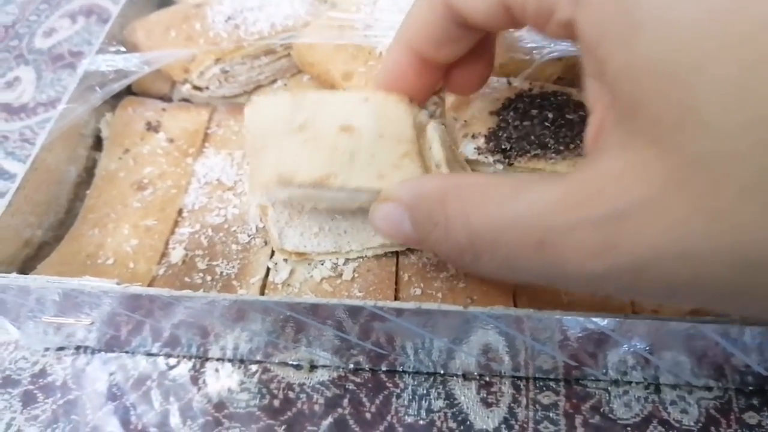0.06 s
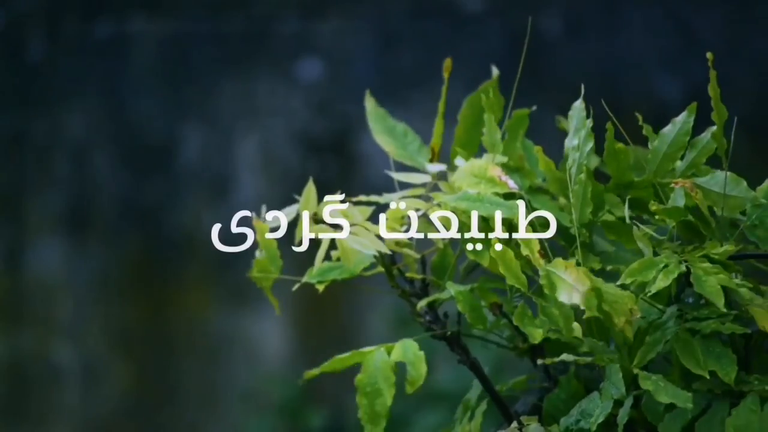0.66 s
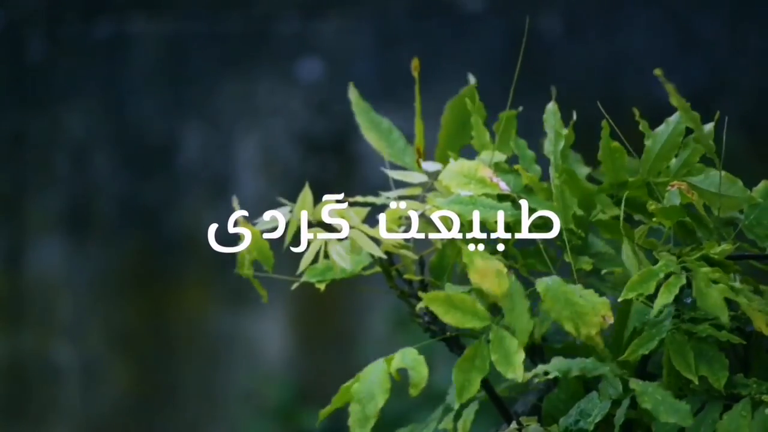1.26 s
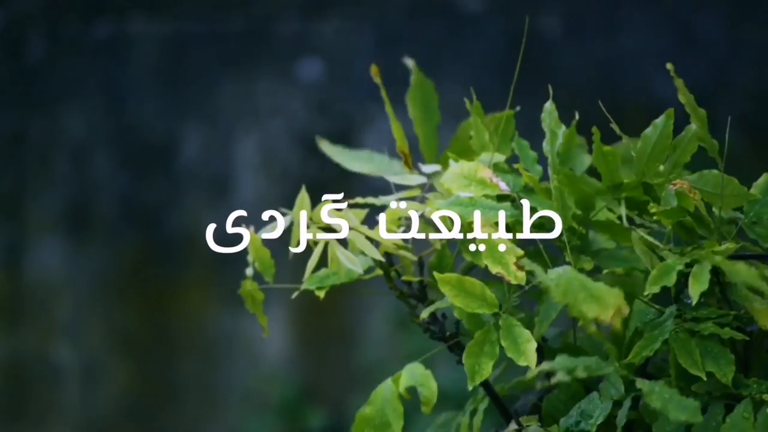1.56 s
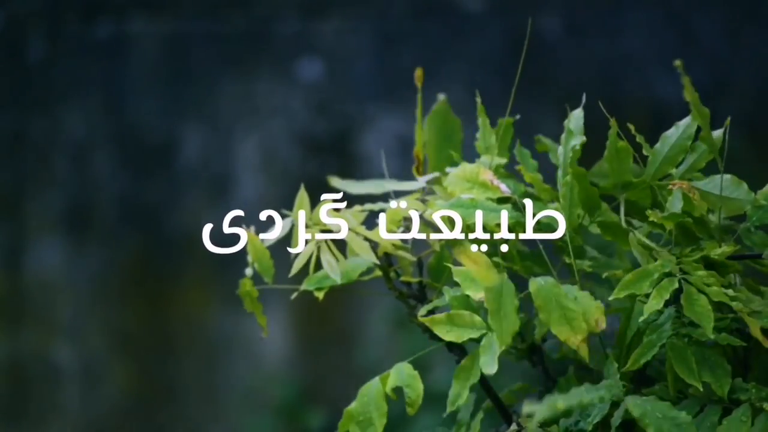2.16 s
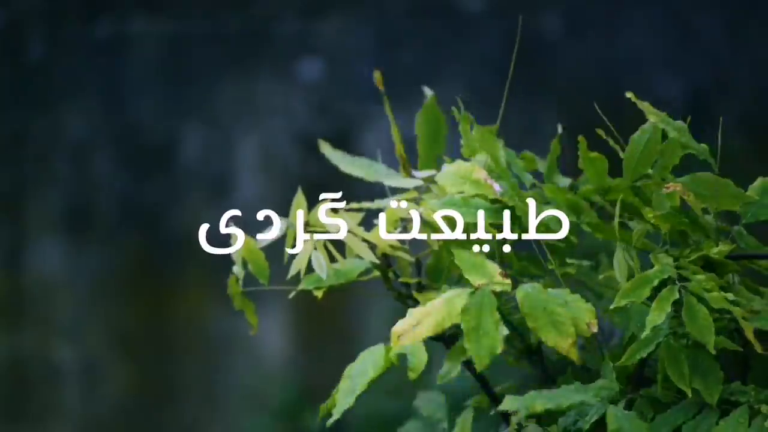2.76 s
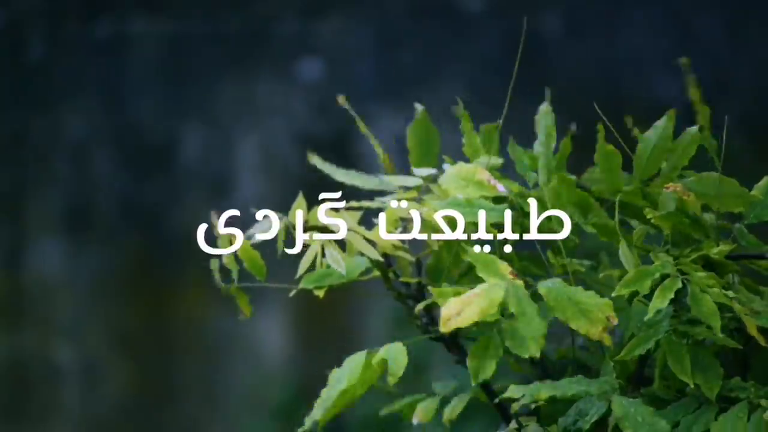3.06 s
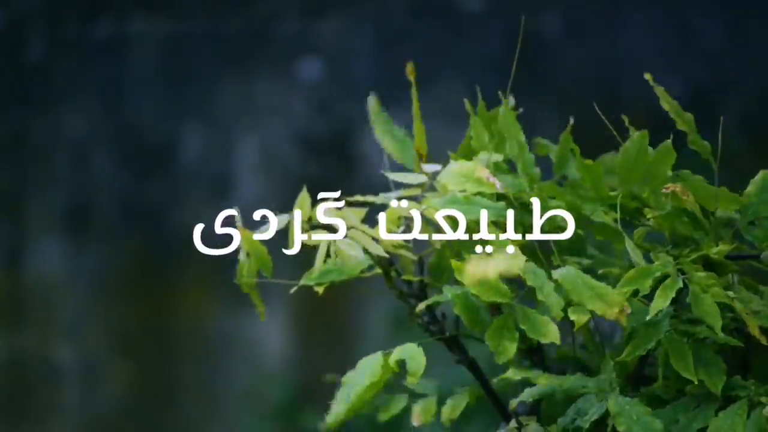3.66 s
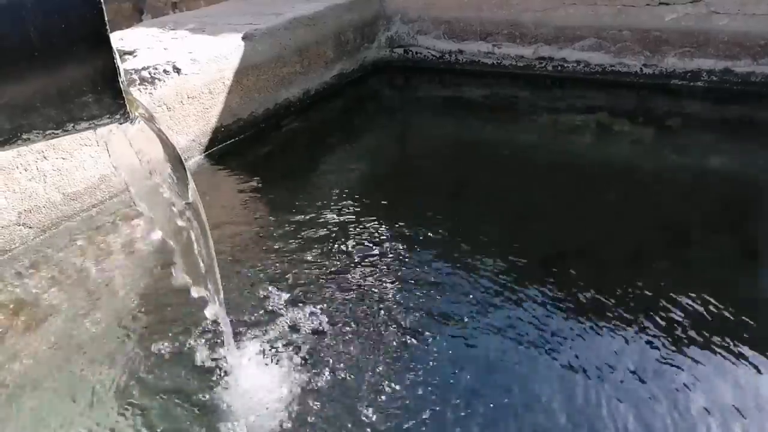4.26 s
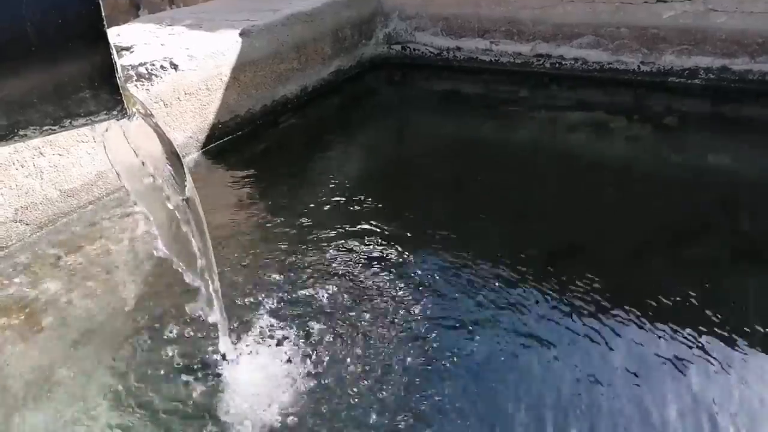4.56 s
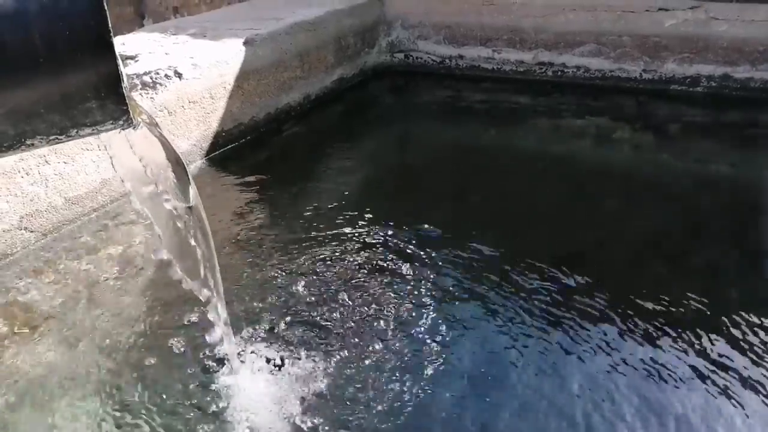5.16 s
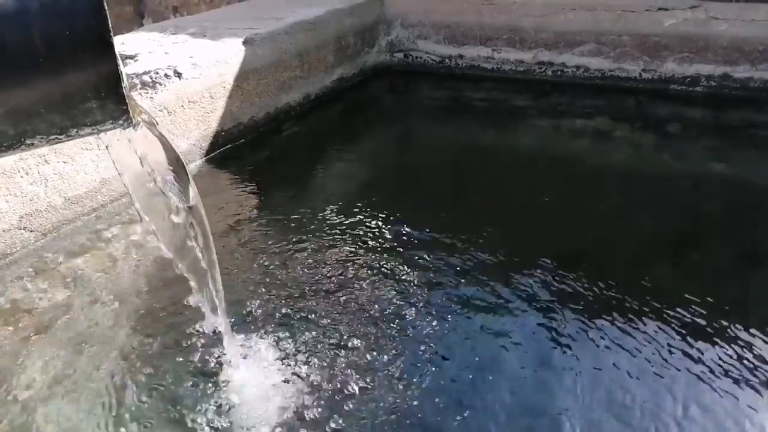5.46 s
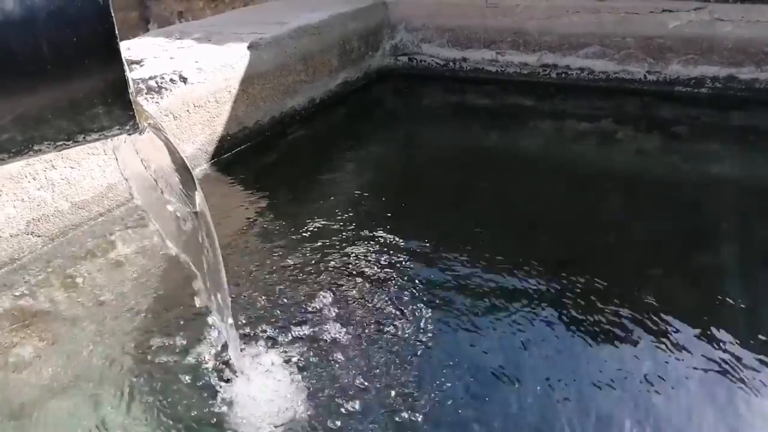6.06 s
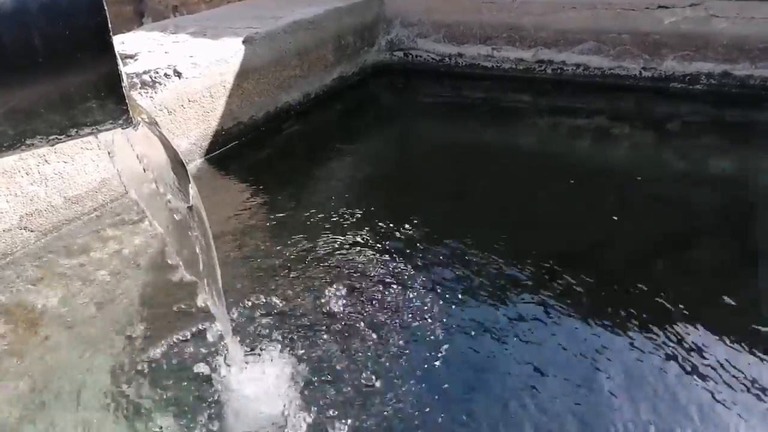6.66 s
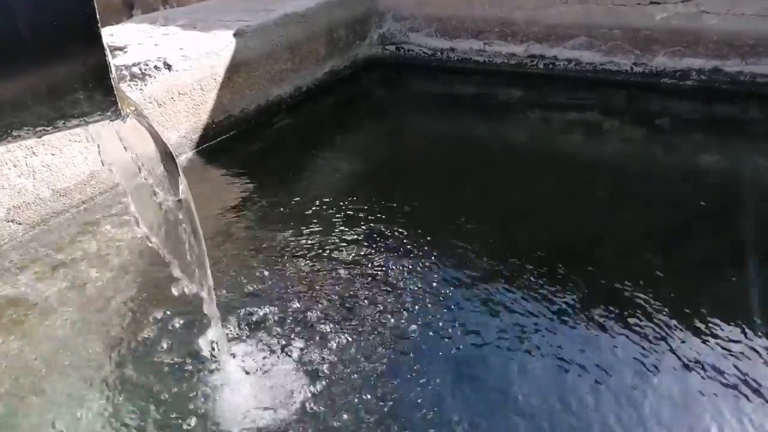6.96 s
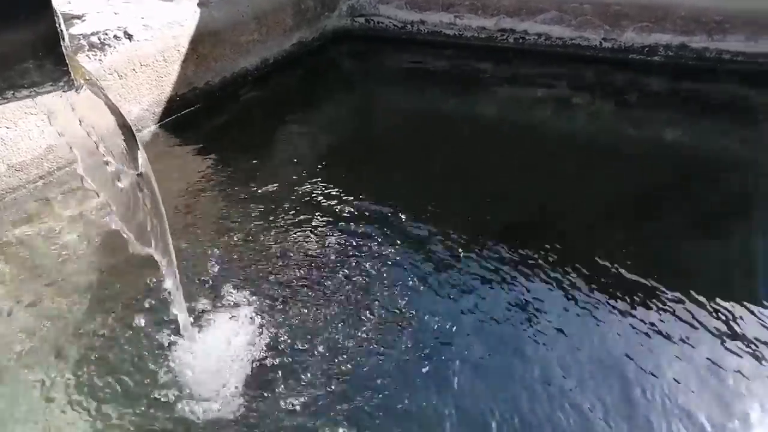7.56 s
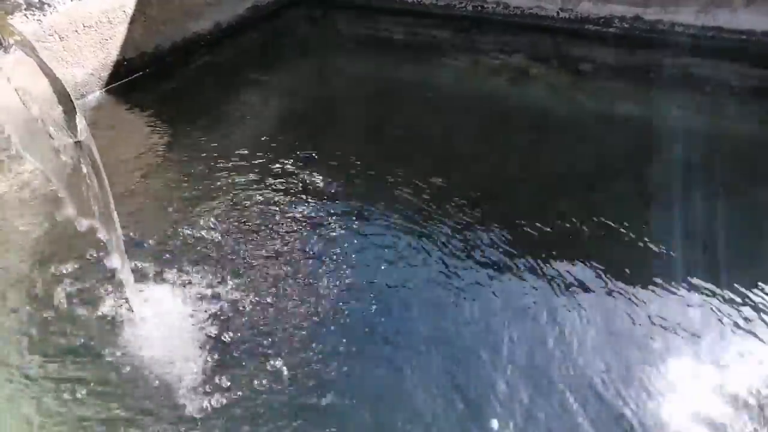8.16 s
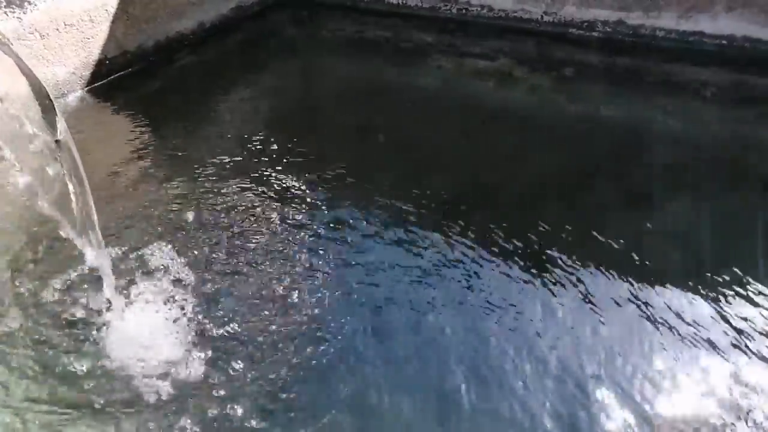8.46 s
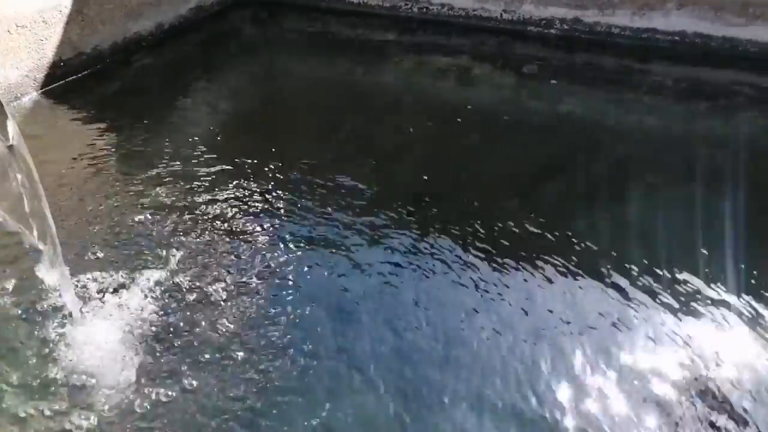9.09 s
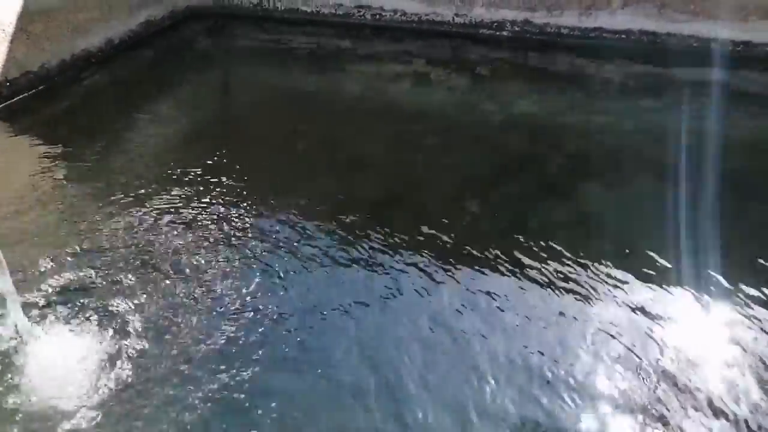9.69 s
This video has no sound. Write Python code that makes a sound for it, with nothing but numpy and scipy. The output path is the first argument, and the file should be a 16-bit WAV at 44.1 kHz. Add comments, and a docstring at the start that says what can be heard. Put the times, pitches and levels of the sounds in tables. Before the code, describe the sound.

First comes steady outdoor rain: a soft hiss, a deep rumble and irregular close drops hitting leaves. The rain stops suddenly, and a moment of silence follows. Then a stream of water plunges into a concrete pool, fizzing, splashing and bubbling as it grows a little louder. Short falling bird chirps sound over faint open-air rumble. A small stereo microphone gives the spray a thin, ringing tone.

```python
"""Rain on a leafy shrub: fat drops slap the nearest leaves, far drops merge into hiss over a low rumble.
After a moment of silence, a jet from a pipe plunges into a concrete pool. Spray crackles, thrown drops
smack, trapped air gurgles between the walls and small bubbles ring in the foam. A small bird chirps
over faint open-air rumble. Two small microphone ports colour the spray and splashes."""
import sys
import numpy as np
from scipy import signal
from scipy.fft import rfft, irfft, next_fast_len
from scipy.io import wavfile
from scipy.ndimage import map_coordinates

SR = 44100
rng = np.random.default_rng(int(sys.argv[2]) if len(sys.argv) > 2 else 0)


def materialize(psi):
    """Save the field psi as 16-bit PCM at rate SR to the path in sys.argv[1].

    A 1-D psi becomes a single channel; in a 2-D psi each row is a channel.
    """
    bounded = np.clip(np.atleast_2d(psi).T, -1, 1)
    quanta = np.round(bounded * 32767).astype(np.int16)
    wavfile.write(sys.argv[1], SR, quanta)


N = 437913
RAIN_START_S, RAIN_END_S, POUR_START_S = .312, 3.789, 4.191

SLAP_EQ = [(3000, -14.5), (6000, -2.5), (8500, 4.5), (11000, -4), (15500, -9.5)]  # f/Hz, gain/dB
LEAF_EQ = [(600, -16.5), (2000, 4), (3800, 5), (5500, 2), (9000, -37)]  # f/Hz, gain/dB
NEAR_DROPS = [(0.5454, -20, -29.5), (0.6932, -18, -29), (0.7757, -12, -22.5), (0.933, -15, -28.5),
              (1.0033, -15.5, -28.5), (1.1489, -18.5, -25), (1.821, -16, -28), (1.939, -18, -17),
              (2.2, -15.5, -39), (2.463, -12.5, -24), (2.82, -12.5, -25), (2.845, -13, -28),
              (2.923, -18.5, -30.5), (3.063, -11, -20.5), (3.117, -18, -23.5), (3.3536, -18, -27),
              (3.533, -7.5, -20), (3.7717, -21.5, -38.5)]  # t/s, slap gain/dB, leaf gain/dB
def leaf_drops():
    """Fat drops slap near leaves and set them sounding, amid lighter patter."""
    slaps = amp(-51) * rng.standard_normal(N) * patter(rate_hz=14, spread_db=17.5, decay_s=.03)
    leaves = np.zeros(N)
    for s, slap_db, leaf_db in NEAR_DROPS:
        add(slaps, s, amp(slap_db + 1.5) * burst(rise_s=.0005, t60_s=.092, shape=(SR // 8,)))
        add(leaves, s, amp(leaf_db + 3.5) * burst(rise_s=.00085, t60_s=.15, shape=(SR // 8,)))
    return coloured(slaps, SLAP_EQ) + coloured(leaves, LEAF_EQ)


HISS_EQ = [(120, -30), (200, 0), (227, -2), (399, -9), (525, -6), (827, -10), (2750, -15), (5490, -19),
           (7090, -16), (9310, -16), (11200, -21), (13200, -21), (15500, -28)]  # f/Hz, gain/dB
def rain_hiss():
    """Countless far drops merge into hiss."""
    impacts = rng.standard_normal(N) * patter(rate_hz=2600, spread_db=-2, decay_s=.0052)
    return amp(-25.5 + .5 * wobble(5)) * unit(coloured(impacts, HISS_EQ))


SPRAY_DRIFT = [(4.35, -40, -7), (4.95, -41, -7), (5.35, -35.5, -1.5), (5.8, -39.5, -7.5), (6.2, -37, -7.5),
               (6.95, -36, -9.5), (7.4, -37.5, -12), (7.75, -36, -7), (8.1, -38, -8), (8.8, -35.5, -8.5),
               (9.3, -36.5, -9.5), (9.75, -32, -7.5)]  # t/s, level/dB, left minus right/dB
def spray():
    """Droplets tick on the pool and leave tiny ringing bubbles; the level shifts as the microphone drifts."""
    shared = rng.standard_normal(N)
    noise = unit(rng.standard_normal((2, N)) + at_ports(shared))
    crackle = patter(rate_hz=340, spread_db=7, decay_s=.0032)
    fizz = .48 * amp(3 * wobble(18))
    sizzle = coloured(noise * np.hypot(crackle, fizz), [(7500, 10), (11000, 8.8), (16000, 13)])
    ticks = rng.standard_normal((2, N)) * patter(rate_hz=40, spread_db=6, decay_s=.0008)
    ticks = coloured(ticks, [(4000, -76), (8000, 12), (11500, 5.5), (15000, 2)])
    tiny = swarm(rate_hz=1400, centre_hz=5800, octaves=.25, spread_db=20, cycles=45, size=550, rise=0)
    tiny = amp(-7 + 3 * wobble(25)) * at_ports(tiny)
    rings = swarm(rate_hz=55, centre_hz=5700, octaves=.2, spread_db=16, cycles=110, size=1200, rise=.01)
    bed = port_resonance(sizzle + ticks + tiny + amp(-6.5) * at_ports(rings))
    bed /= np.std(bed[:, round(POUR_START_S * SR):], axis=1, keepdims=True)
    level_db, left_db = curves(SPRAY_DRIFT)
    ebb_db = 1.7 * wobble(16) - 1.3
    return bed * amp(level_db + ebb_db + np.outer([.5, -.5], left_db))


THROWN_DROPS = [(4.2403, -24, -34), (4.409, -33, -52.0), (4.5492, -26, -49.0), (4.6635, -25, -47.5),
                (4.783, -25.5, -32), (4.8955, -27, -51), (5.063, -31, -22.5), (5.1512, -43, -30),
                (5.1852, -34.5, -27.5), (5.3123, -36, -26), (5.665, -35, -33), (5.733, -23, -37.0),
                (5.8571, -29, -30), (5.909, -31, -36.5), (5.9416, -22.0, -33), (5.9924, -23, -45.5),
                (6.102, -23.5, -42), (6.1378, -20.5, -42.5), (6.245, -36, -25), (6.254, -36, -28),
                (6.3576, -23.5, -35), (6.401, -30, -33), (6.548, -21, -50), (6.6406, -41, -27),
                (6.8218, -17, -45), (6.8598, -21, -47), (6.902, -26, -50.0), (6.9272, -21.5, -26),
                (6.9958, -19.5, -31), (7.024, -18.5, -28), (7.039, -23, -21), (7.139, -23, -44),
                (7.2635, -20.0, -39), (7.3193, -14.5, -43), (7.3986, -21.5, -28), (7.8253, -19, -40.0),
                (7.88, -20.5, -39), (8.0473, -16.5, -29), (8.1604, -20.5, -42.0), (8.226, -24.5, -47),
                (8.2506, -21, -23.5), (8.303, -19, -36), (8.372, -15, -41), (8.53, -34, -31.0),
                (8.551, -20.5, -22), (8.6232, -20, -39), (8.686, -22, -26), (8.765, -22, -35.0),
                (8.8189, -19, -42), (8.8816, -30, -29.5), (8.8903, -20, -22), (9.0113, -25, -42.5),
                (9.0435, -29, -26), (9.118, -19, -26), (9.2586, -19.0, -33), (9.3377, -22.5, -45.0),
                (9.3895, -30, -26), (9.6, -20.5, -27), (9.663, -24, -23), (9.806, -24, -41),
                (9.853, -18.0, -40)]  # t/s, smack gain/dB, spit gain/dB
def splashes():
    """A thrown drop lands with a bright spit, a smack and a brief ring; a smaller droplet follows."""
    out, size = np.zeros((2, N)), SR // 20
    t = np.arange(size) / SR
    for s, smack_db, spit_db in THROWN_DROPS:
        ring_hz = rng.uniform(4700, 6600)
        ring = np.sin(2 * np.pi * ring_hz * t) * amp(-60 * t / .035) * (1 - np.exp(-t / .0006))
        smack = burst(rise_s=.0005, t60_s=.02, shape=(2, size)) + .35 * ring
        smack = coloured(smack, [(3300, -8), (4600, 0), (6500, 0), (8500, -2), (11000, -6)])
        smack = port_resonance(smack)
        smack *= amp(smack_db + 1) / abs(smack.mean(0)).max()
        spit = burst(rise_s=.0002, t60_s=.006, shape=(2, size))
        spit = coloured(spit, [(3000, -24), (5500, -18), (8000, -5), (11000, 4), (15000, -1)])
        spit = port_resonance(spit)
        spit *= amp(spit_db + 3.5) / abs(spit.mean(0)).max()
        add(out, s + .0005, smack + spit)
        add(out, s + rng.uniform(.003, .014), amp(-13) * smack)
    return out


PORT_EQ = [(1000, -45, -45), (2400, -31, -38), (3140, -16, -20), (3870, -21.5, -18.5), (5010, -11.5, -2.5),
           (5520, -24.5, 1.5), (6670, -11, -2), (7220, -16, -11), (8220, -7.5, -31), (9140, -15, -29),
           (10430, -22.5, -27.5), (12000, -23, -26), (13300, -42, -24), (14500, -25, -43),
           (15800, -42, -23)]  # f/Hz, left gain/dB, right gain/dB
def port_resonance(x):
    """Each microphone port rings with its own resonances."""
    return np.array([coloured(x[c], [(row[0], row[c + 1]) for row in PORT_EQ]) for c in range(2)])


WATER_PATH = [(7, .00028, .35, .15), (8, .000297, .45, .3), (9, .00031, .55, .42), (9.9, .000332, .6, .45)]  # t/s, delay/s, left gain, right gain
def water_bounce(x):
    """Treble reflects off the water; as the microphone moves, the bounce grows and lags."""
    treble = signal.sosfiltfilt(signal.butter(3, 5500, "high", fs=SR, output="sos"), x)
    delay_s, *gains = curves(WATER_PATH)
    delayed = np.array([np.interp(clock() - delay_s, clock(), side) for side in treble])
    return x - np.array(gains) * delayed


AIR_GULPS = [(4.952, -31, 1030, -58), (5.117, -31, 159, -59), (5.247, -20, 2020, -49),
             (5.447, -26, 520, -41.5), (6.095, -31, 910, -39), (6.536, -29, 1125, -44.5),
             (7.149, -22.5, 1900, -43), (7.182, -25, 211, -52), (7.472, -29, 1180, -59),
             (7.614, -28, 200, -64), (7.667, -27, 184, -70), (7.698, -31, 198, -49), (7.822, -29, 302, -40),
             (8.044, -29, 1140, -67), (8.159, -31, 685, -41), (8.223, -24, 211, -35.5),
             (8.295, -24, 210, -47), (8.55, -19, 2100, -44), (9.036, -36, 196, -46),
             (9.144, -27.5, 540, -55), (9.437, -20.5, 188, -51), (9.505, -28, 138, -50),
             (9.567, -30, 740, -53)]  # t/s, gulp gain/dB, f/Hz, breakup gain/dB
DRAGGED_AIR = [(4.3, -63, -63), (4.8, -65, -61.5), (5.2, -57, -54.5), (5.65, -64, -58), (6.1, -55, -60),
               (6.8, -61, -59), (7.65, -54, -56), (8.05, -54.5, -56), (8.3, -54, -51), (8.6, -53, -60),
               (9, -51.5, -56), (9.9, -54.5, -57.5)]  # t/s, large-bubble gain/dB, mid-bubble gain/dB
def gurgle():
    """The jet drags air under in gulps that ring and break into bubbles; the pool wall echoes."""
    gulps, breakup = np.zeros((2, N))
    t, order = np.arange(SR // 4) / SR, np.arange(6)
    for s, gulp_db, hz, breakup_db in AIR_GULPS:
        lag, scatter = rng.standard_normal((2, len(order)))
        onsets_s = s + .004 * abs(lag) * order
        pitches_hz = hz * 2 ** (.15 * order * np.tanh(scatter))
        cycles = 5.5 * (hz / 200) ** .5
        gulp = bubbles(onsets_s, pitches_hz, amp(-2.4 * order), cycles, rise=.06, size=4000)
        gulps += amp(gulp_db - 8.5) * gulp / abs(gulp).max()
        add(breakup, s, amp(breakup_db) * np.exp(-t / .043))
    large_db, mid_db = curves(DRAGGED_AIR)
    churn = unit(np.hypot(patter(rate_hz=30, spread_db=2, decay_s=.014), .55))
    large = swarm(rate_hz=420, centre_hz=258.5, octaves=.794, spread_db=8, cycles=2.8, size=1800)
    large *= np.hypot(amp(large_db + 5.5) * churn, amp(-2) * breakup)
    mid = swarm(rate_hz=420, centre_hz=920, octaves=.62, spread_db=13, cycles=13, size=1300)
    mid *= np.hypot(amp(mid_db - 2.5) * churn, amp(-5) * breakup)
    eq = [(60, -13.5), (150, -8), (200, -9), (260, -11), (600, -4.5), (1250, 0), (1600, -1.5), (2200, -.5)]
    water = coloured(large + mid + gulps, eq)
    wall_echo = .5 * np.roll(water, round(.0097 * SR))
    return at_ports(water + wall_echo, left_db=6)


FOAM_BED = [(4.3, -58.5), (4.65, -69), (4.9, -56), (5.3, -54.5), (5.75, -53.5), (6.05, -54), (6.35, -54),
            (6.7, -60), (6.95, -58.5), (7.27, -51), (7.42, -57), (7.8, -57.5), (8.2, -55.5), (8.5, -54),
            (8.7, -60), (9.08, -50), (9.35, -55), (9.6, -51.5), (9.9, -51)]  # t/s, gain/dB
FOAM_CLUSTERS = [(4.39, -61, -66), (4.79, -55, -70), (5.19, -62, -49), (5.4, -63, -52), (5.87, -51, -62),
                 (6.07, -41.5, -54), (7.08, -56, -55), (7.53, -50, -44), (8.32, -56, -64), (8.76, -74, -46),
                 (9.52, -54, -65), (9.66, -48, -60)]  # t/s, small-bubble gain/dB, larger-bubble gain/dB
def foam():
    """Small bubbles and fewer larger ones ring as they surface, steadily and in clusters."""
    s, small_db, larger_db = np.transpose(FOAM_CLUSTERS)
    small = np.array([
        swarm(rate_hz=420, centre_hz=3000, octaves=.2, spread_db=12, cycles=50, size=1100, rise=.04)
        for _ in range(2)])
    larger = swarm(rate_hz=250, centre_hz=2000, octaves=.2, spread_db=12, cycles=22, size=800)
    bed_gain = amp(curves(FOAM_BED)[0] + 4 * wobble(13) - 1)
    small *= np.hypot(bed_gain, swells(s, amp(small_db), sigma_s=.024))
    larger *= np.hypot(amp(-4.5) * bed_gain, swells(s, amp(larger_db), sigma_s=.024))
    stereo = small * amp([[3], [-3]]) + at_ports(larger, left_db=4.6)
    return coloured(stereo, [(1000, -3), (1900, 1.5), (3800, 6.5), (6000, -16)])


LONE_BUBBLES = [(6.184, -35.5, 5130), (9.519, -33, 5920)]  # t/s, level/dB, f/Hz
def plinks():
    """Lone small bubbles ring on, to the right."""
    s, db, hz = np.transpose(LONE_BUBBLES)
    return at_ports(bubbles(s, hz, amp(db), cycles=550, rise=.009, size=4000), left_db=-23)


BIRD_CHIRPS = [(4.782, -57, 3370, 3.2, 0.065), (4.982, -48.5, 4010, 5.9, 0.14),
               (5.612, -41, 4370, 21, 0.074), (5.678, -43.5, 3550, 5.8, 0.047),
               (5.853, -48, 3890, 7.2, 0.1), (6.488, -40, 3890, 10, 0.12), (7.119, -39.5, 4680, 5.5, 0.11),
               (7.19, -37, 3730, 6.1, 0.1), (7.937, -43, 4040, 11.2, 0.076), (8.446, -40, 4190, 13, 0.075),
               (8.508, -40, 3450, 5.9, 0.075), (8.981, -39, 3790, 7.5, 0.12),
               (9.181, -39.5, 4010, 6.4, 0.12), (9.745, -42, 4100, 6.5, 0.11),
               (9.891, -40, 4100, 9.7, 0.088)]  # mid t/s, gain/dB, mid f/Hz, fall/(oct/s), length/s
def bird():
    """The two sides of the throat slide down together, raspy and quavering; walls and trees echo."""
    waver_hz, waver_oct, rasp_oct, voice_gap_oct = 30.6, .075, .075, .23
    out, t = np.zeros((2, N)), np.arange(SR // 8) / SR
    for s, db, mid_hz, fall_oct_per_s, length_s in BIRD_CHIRPS:
        whistle = np.zeros(len(t))
        arch = np.sqrt(abs(np.sin(np.pi * np.minimum(t / length_s, 1))))
        slide_oct = -fall_oct_per_s * (t - length_s / 2)
        for side in (-.5, .5):
            rasp, flutter = (np.interp(t, np.linspace(0, t[-1], knots), rng.standard_normal(knots))
                             for knots in (110, 16))
            waver = np.sin(2 * np.pi * (waver_hz * t + rng.random()))
            hz = mid_hz * 2 ** (side * voice_gap_oct + waver_oct * waver + rasp_oct * rasp + slide_oct)
            whistle += arch * amp(4 * flutter - 5 * side) * np.sin(2 * np.pi * np.cumsum(hz) / SR)
        paths = burst(rise_s=.002, t60_s=.12, shape=(2, SR // 6))
        paths *= amp(-1.5) / np.linalg.norm(paths, axis=1, keepdims=True)
        paths[:, 0] += 1  # direct path
        chirp = coloured(signal.fftconvolve(whistle[None], paths, axes=1), [(2000, -18), (3000, 0)])
        rms = np.sqrt(np.sum(chirp ** 2, axis=1, keepdims=True) / (length_s * SR))
        add(out, s - length_s / 2, amp(db - .7) * chirp / rms)
    return out * amp([[5], [1.5]])


RUMBLE_EQ = [(8.8, -25.5), (15, 7.5), (54, -1), (135, -6), (199, -13), (225, -27), (280, -20.5), (400, -24),
             (520, -23.5), (880, -120)]  # f/Hz, gain/dB
RUMBLE_GUSTS = [(.49, 5.5), (.84, 4), (1.5, 4), (3.218, 4)]  # t/s, boost/dB
def rumble():
    """Gusts swell the low rumble under the rain."""
    level_db = -24.5 + swells(*np.transpose(RUMBLE_GUSTS), sigma_s=.057) + 1.4 * wobble(6.5)
    return amp(level_db) * unit(coloured(rng.standard_normal(N), RUMBLE_EQ))


AIR_EQ = [(12, -57), (20, 13), (134, 3.5), (200, 7.5), (260, -25), (306, -2.5), (1310, 2), (1600, -10.5),
          (2500, 6), (3250, -39), (5500, -120)]  # f/Hz, gain/dB
def open_air():
    """Faint open-air rumble with one soft low bump."""
    noise = rng.standard_normal(N) + 1.86 * rng.standard_normal((2, N))
    air = amp(-59.5) * unit(coloured(noise, AIR_EQ))
    bump = burst(rise_s=.0053, t60_s=.25, shape=(SR // 3,))
    bump = coloured(bump, [(20, 4), (60, -12), (110, -11), (300, -48)])
    add(air, 6.55, amp(-37) * bump / abs(bump).max())
    return air


def bubbles(times_s, hz, gains, cycles, rise, size):
    """Damped sines, size samples long, that rise in pitch as each bubble nears the surface."""
    t = np.arange(size) / SR
    periods = t * hz[:, None]
    age = periods / cycles
    phase = 2 * np.pi * periods * (1 + rise * np.minimum(age, 2) / 2)
    waves = gains[:, None] * np.sin(phase) * np.exp(-np.pi * age) * (1 - np.exp(-periods))
    index = (times_s * SR).astype(int)[:, None] + np.arange(size)
    return np.bincount(index.ravel(), waves.ravel(), N)[:N]


def swarm(rate_hz, centre_hz, octaves, spread_db, cycles, size, rise=.1):
    """Steady random bubbles, rms 1 while the jet pours."""
    pour_s = N / SR - POUR_START_S
    when, pitch, strength = rng.random((int(rate_hz * pour_s), 3)).T
    offset_oct = octaves * np.arctanh(np.clip(2 * pitch - 1, -.99, .99))
    hz = np.minimum(centre_hz * 2 ** offset_oct, SR / 3)
    x = bubbles(POUR_START_S + when * pour_s, hz, amp(spread_db * strength ** 2), cycles, rise, size)
    return x / np.std(x[round(POUR_START_S * SR):])


def patter(rate_hz, spread_db, decay_s):
    """Envelope of many tiny impacts of random size, rms 1."""
    hits = rng.random(N) < rate_hz / SR
    sizes = amp(spread_db * np.minimum(rng.standard_normal(N), np.pi / 2))
    power = signal.lfilter([1], [1, -np.exp(-2 / (decay_s * SR))], (hits * sizes) ** 2)
    return unit(np.sqrt(power))


def burst(rise_s, t60_s, shape):
    """Noise that swells and dies, envelope peak 1."""
    t = np.arange(shape[-1]) / SR
    envelope = (1 - np.exp(-t / rise_s)) * amp(-60 * t / t60_s)
    return envelope / envelope.max() * rng.standard_normal(shape)


def at_ports(x, left_db=0):
    """Mono to stereo: left leads by 9 samples and exceeds right by left_db."""
    return np.array([x * amp(left_db / 2), np.roll(x, 9) * amp(-left_db / 2)])


def coloured(x, eq):
    """Minimum-phase filter through (f/Hz, gain/dB) points."""
    m = 2 * next_fast_len(x.shape[-1] // 2 + 4096)
    hz, db = np.transpose(eq)
    gain = amp(np.interp(np.log(np.fft.rfftfreq(m, 1 / SR) + 1), np.log(hz + 1), db))
    cepstrum = irfft(np.log(np.maximum(gain, 1e-6)))
    cepstrum[1:m // 2] *= 2
    cepstrum[m // 2 + 1:] = 0
    return irfft(rfft(x, m) * np.exp(rfft(cepstrum)), m)[..., :x.shape[-1]]


def swells(times_s, heights, sigma_s):
    """Sum of Gaussian humps."""
    track, t = np.zeros(N), np.arange(-SR // 4, SR // 4) / SR
    for s, height in zip(times_s, heights):
        add(track, s + t[0], height * np.exp(-.5 * (t / sigma_s) ** 2))
    return track


def wobble(rate_hz):
    """Smooth random curve, rate_hz knots a second."""
    return map_coordinates(rng.standard_normal(int(N * rate_hz / SR) + 4), [clock() * rate_hz])


def curves(rows):
    """Each column after t/s, interpolated per sample."""
    s, *columns = np.transpose(rows)
    return [np.interp(clock(), s, column) for column in columns]


def add(track, s, sound):
    """Mix sound into track at s seconds."""
    part = track[..., max(round(s * SR), 0):][..., :sound.shape[-1]]
    part += sound[..., :part.shape[-1]]


def amp(db):
    """dB to gain."""
    return 10 ** (np.asarray(db) / 20)


def unit(x):
    """x at rms 1."""
    return x / np.sqrt(np.mean(x ** 2) + 1e-20)


def clock():
    """Sample times in s."""
    return np.arange(N) / SR


def scene():
    """Mono rain, silence, then the pool in stereo."""
    pool = water_bounce(spray() + splashes()) + bird() + plinks() + foam() + gurgle() + open_air()
    rain = rumble() + rain_hiss() + leaf_drops()
    edges_s = [RAIN_START_S, RAIN_START_S + .008, RAIN_END_S - .003, RAIN_END_S]
    return rain * np.interp(clock(), edges_s, [0, 1, 1, 0]) + pool * (clock() > POUR_START_S)


def record(dry):
    """Steep low-pass band limit."""
    top_hz, edge_hz = 15750, 300
    m = next_fast_len(N + SR // 2)
    passband = np.clip((top_hz - np.fft.rfftfreq(m, 1 / SR)) / edge_hz + .5, 0, 1)
    return irfft(rfft(dry, m) * passband, m)[:, :N]


dry = scene()
out = record(dry)
materialize(out)
```